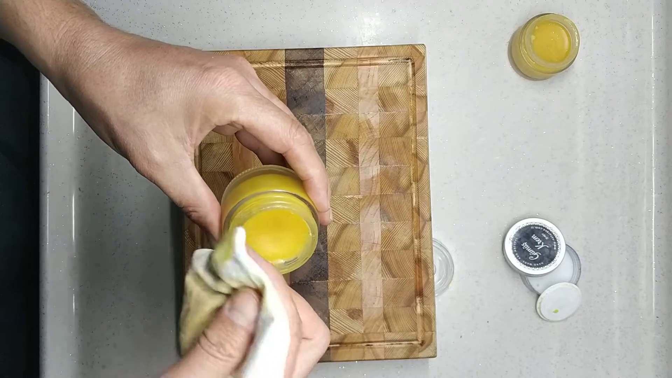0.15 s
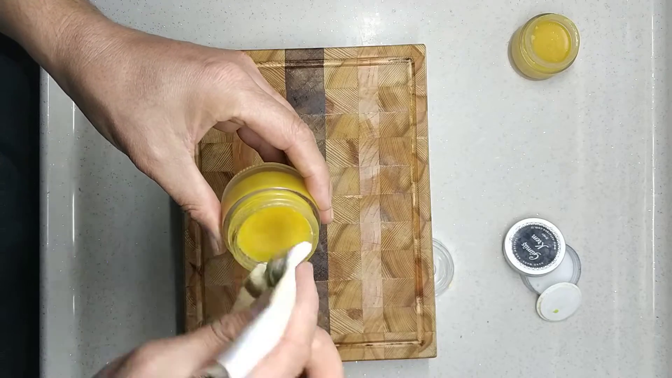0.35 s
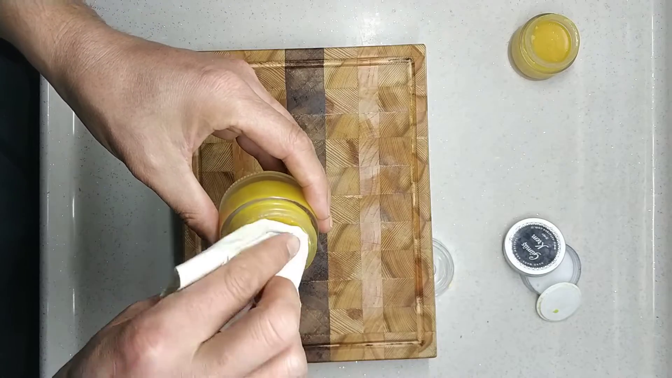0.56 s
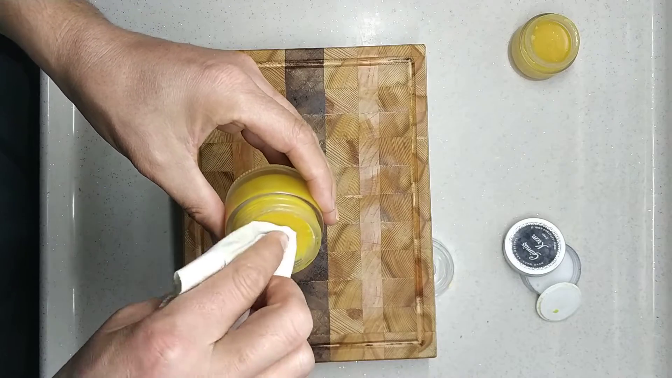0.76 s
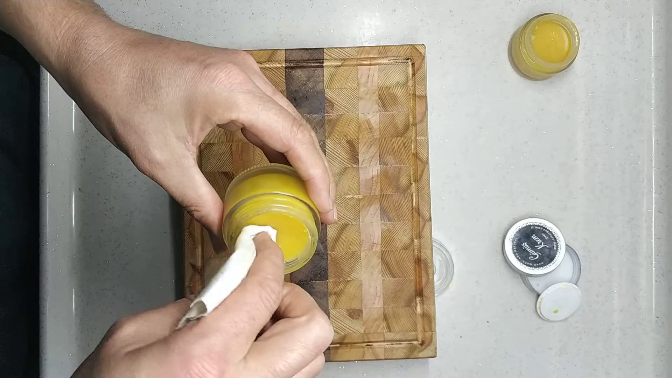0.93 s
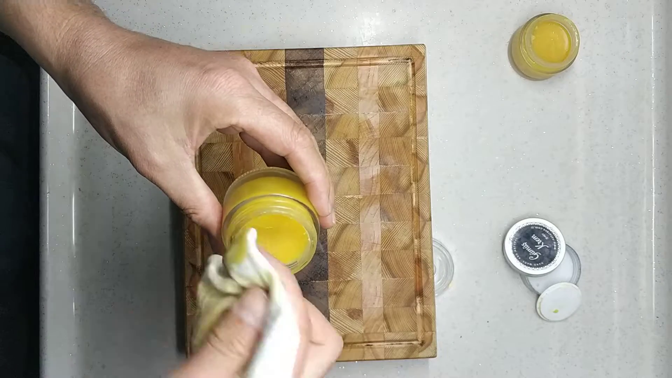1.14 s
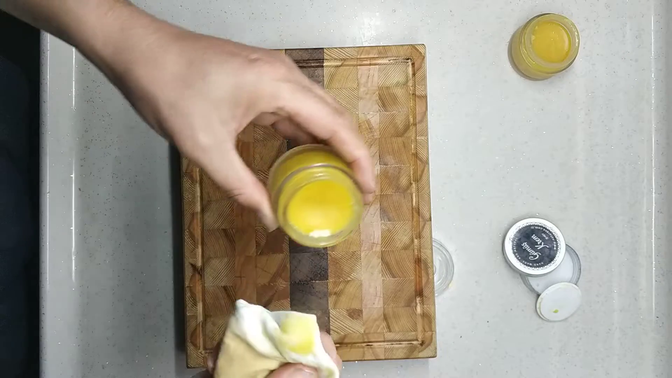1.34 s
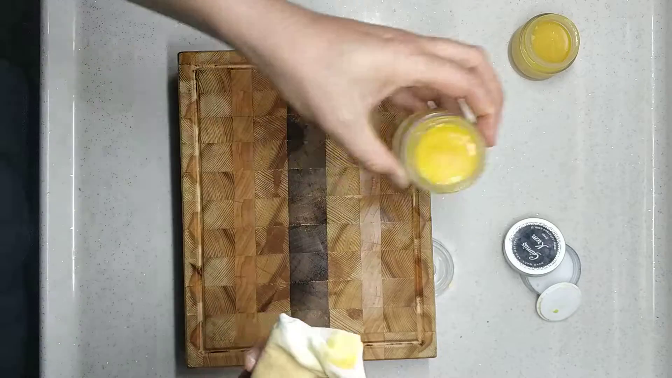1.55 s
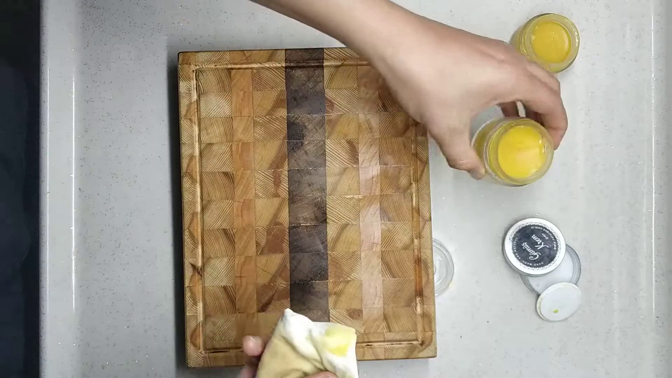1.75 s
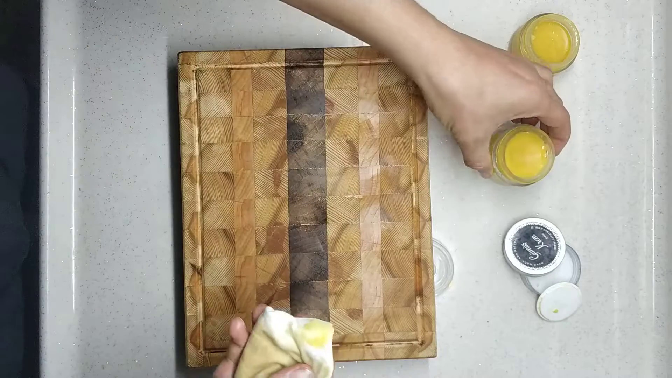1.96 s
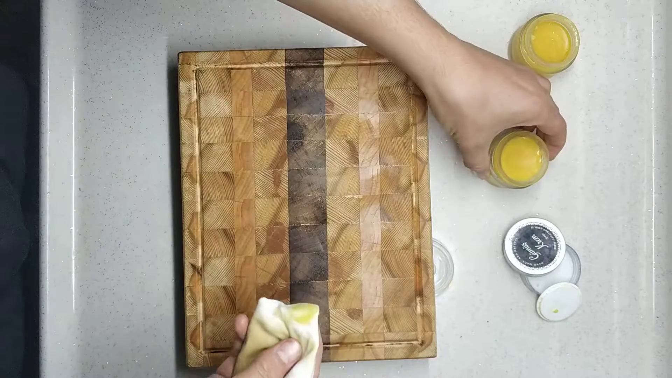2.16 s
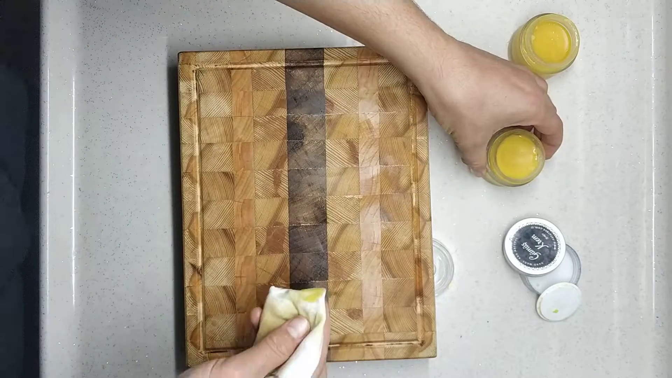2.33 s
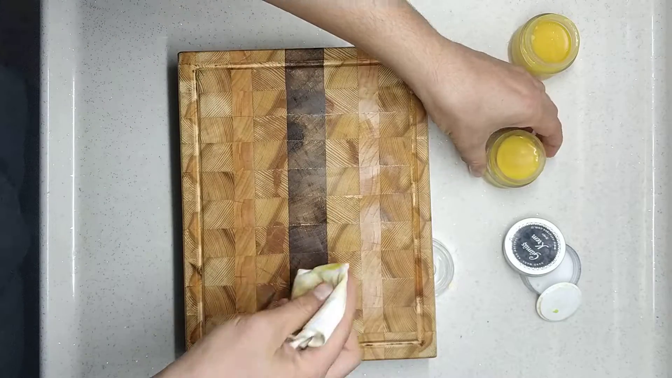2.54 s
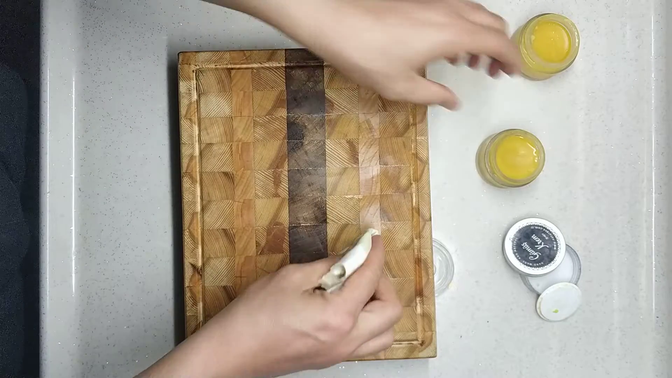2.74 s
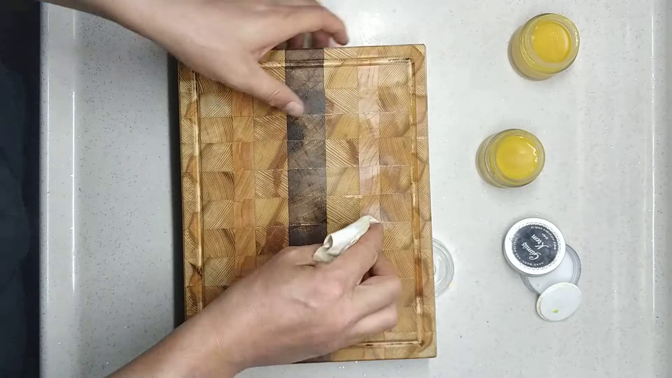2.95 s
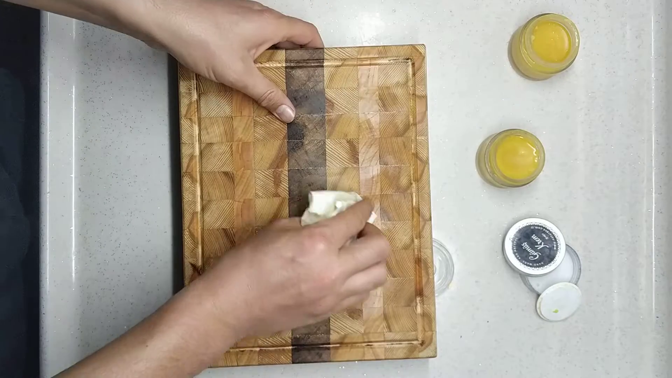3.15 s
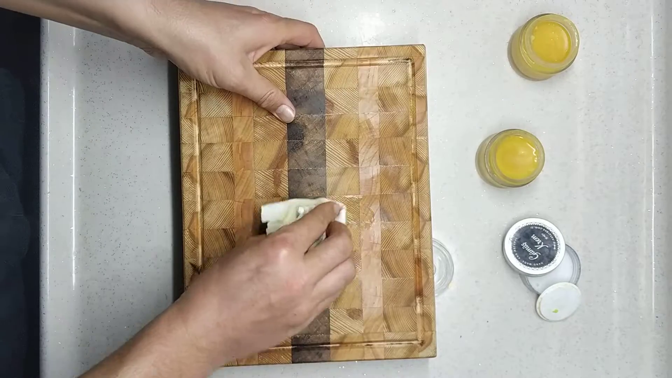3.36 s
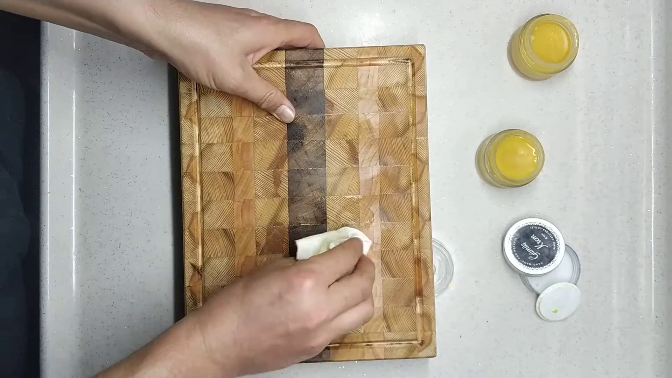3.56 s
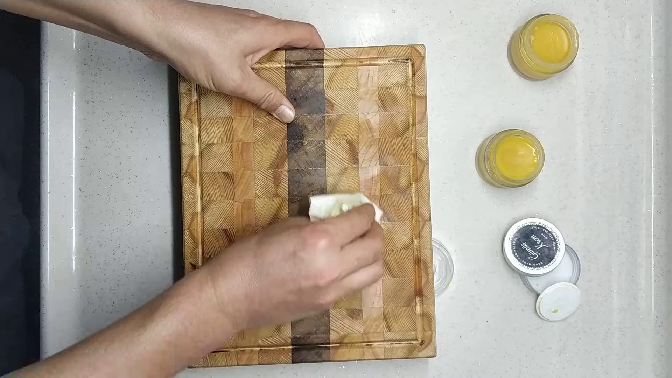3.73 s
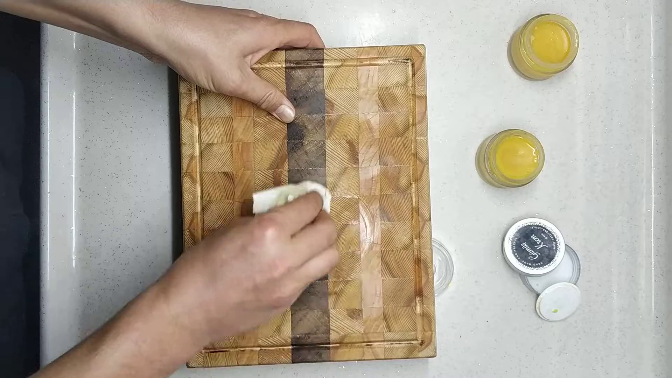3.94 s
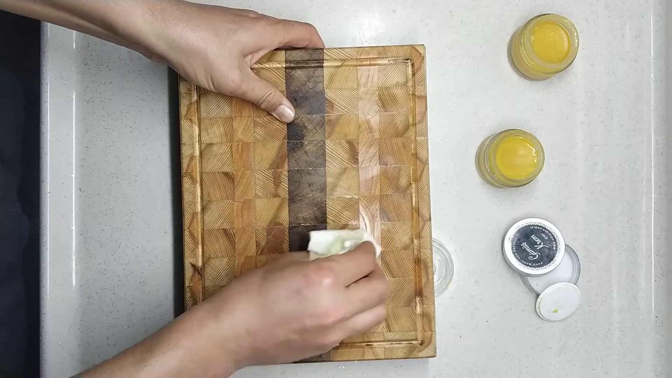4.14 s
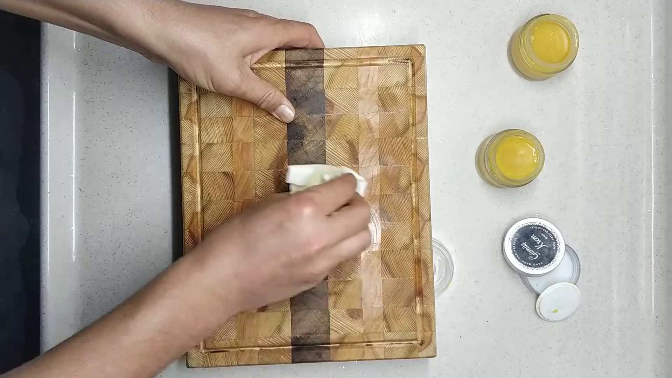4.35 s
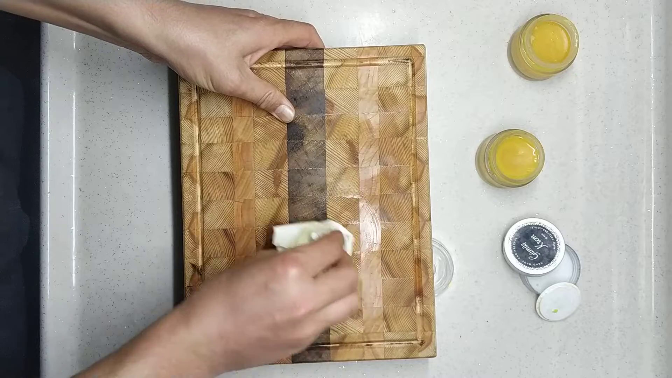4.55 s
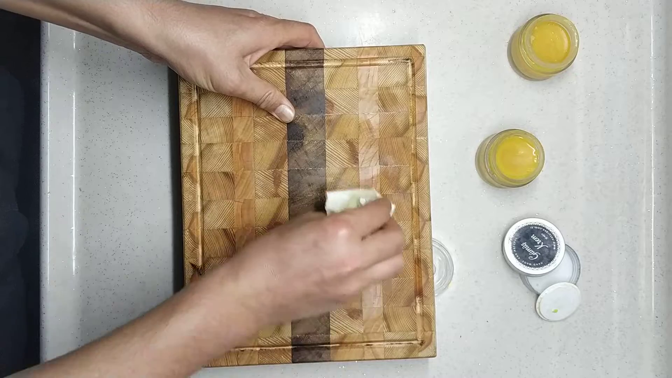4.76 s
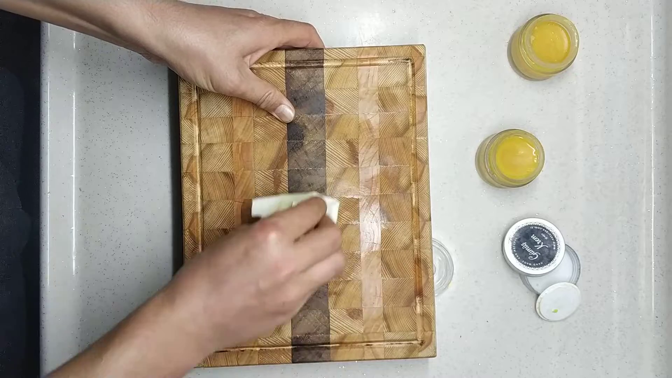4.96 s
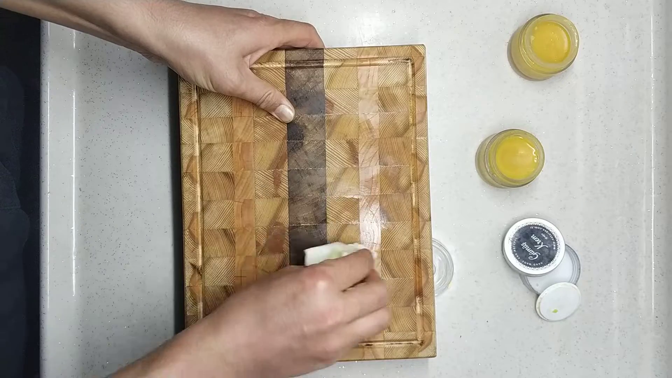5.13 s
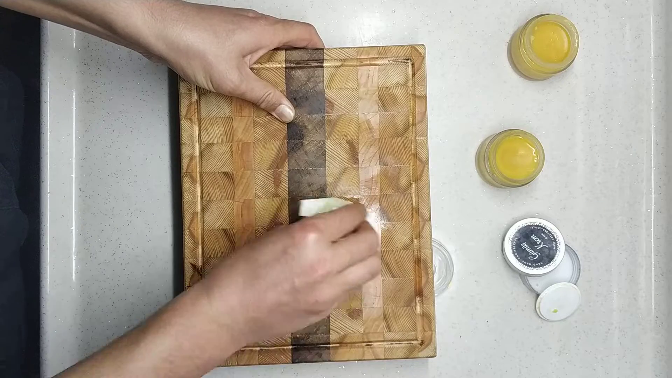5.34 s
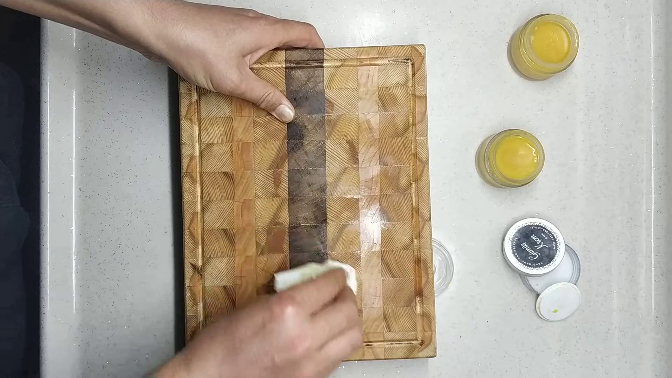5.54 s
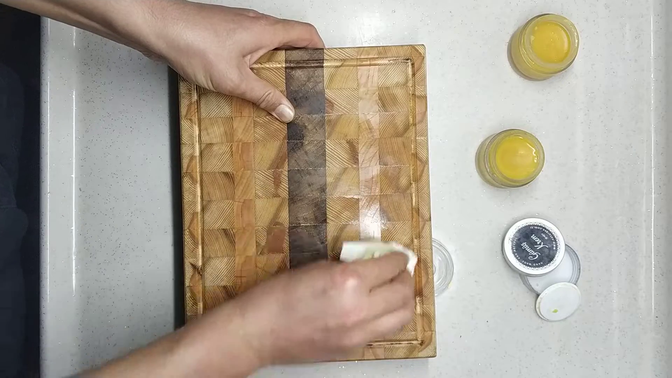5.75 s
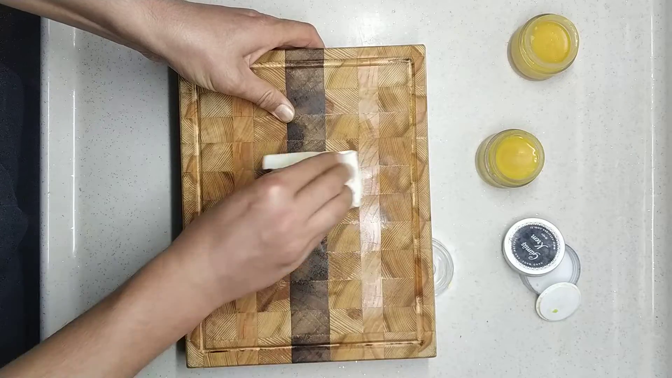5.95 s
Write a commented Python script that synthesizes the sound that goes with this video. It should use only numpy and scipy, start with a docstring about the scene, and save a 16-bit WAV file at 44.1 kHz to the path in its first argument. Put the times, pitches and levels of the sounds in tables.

```python
"""A folded cloth rubs wax into a wooden board on a kitchen counter, under a phone: filtered noise whose
gain follows the speed of each stroke. Before that the sticky cloth snaps off the wax and a glass jar is
set down, rocking once. Short noise bursts crack, and most ring decaying modes of what they strike; the
board knocks and rumbles on the counter as the strokes push it. A small hard room, a decaying noise tail,
answers each knock."""
import sys
import numpy as np
from scipy import signal
from scipy.fft import rfft, irfft, next_fast_len
from scipy.io import wavfile
from scipy.ndimage import uniform_filter1d

SR = 44100
rng = np.random.default_rng(int(sys.argv[2]) if len(sys.argv) > 2 else 0)


def volts_from_decibels(level):
    """Turn decibel levels (scalar or array-like) into linear amplitude factors."""
    exponent = np.asarray(level, float) / 20
    return 10 ** exponent


def log_audio(samples):
    """Write samples as a 16-bit WAV file to the path given in sys.argv[1]."""
    # one column per channel
    frames = np.atleast_2d(samples).T
    # limit to full scale, then quantise
    limited = np.clip(frames, -1, 1)
    pcm = np.round(limited * 32767).astype(np.int16)
    wavfile.write(sys.argv[1], SR, pcm)


N = 264600
T = np.arange(N) / SR  # seconds


def level(x, db):
    """Root-mean-square level: scale a signal to the given dB."""
    return x * volts_from_decibels(db) / np.sqrt(np.mean(x ** 2))


def shape(x, gain_at):
    """Linear filtering: multiply the spectrum by a gain given as a function of frequency."""
    size = 2 * next_fast_len(len(x))
    hz = np.arange(size // 2 + 1) * SR / size
    return irfft(rfft(x, size) * gain_at(hz), size)[:len(x)]


def colour(x, table):
    """Minimum phase: a causal filter through (Hz, dB) points, its phase from the folded cepstrum."""
    hz, db = np.transpose(table)

    def gain_at(f):
        log_gain = np.log(volts_from_decibels(np.interp(np.log(f + 1), np.log(hz), db)))
        cepstrum = irfft(log_gain)
        fold = np.where(np.arange(len(cepstrum)) < len(f) - 1, 2., 0.)
        fold[0] = 1
        return np.exp(rfft(cepstrum * fold))
    return shape(x, gain_at)


def peaks(f, table):
    """Resonance: the summed complex response of (Hz, width in Hz, dB) peaks."""
    return sum(volts_from_decibels(db) / (1 + 2j * (f - hz) / width) for hz, width, db in table)


def shifting(x, depth_db, hold, wide):
    """Shifting reflections: as the hand moves, narrow streaks of pitch swell and fade."""
    _, _, z = signal.stft(x, nperseg=1024)
    field = rng.standard_normal(z.shape)
    field = uniform_filter1d(field, size=hold, axis=1)  # over time frames
    field = uniform_filter1d(field, size=wide, axis=0)  # over frequency bins
    return signal.istft(z * volts_from_decibels(depth_db * field / field.std()), nperseg=1024)[1][:N]


FASTEST_AT, SPEED_POWER = 0.46, 0.92  # share of a movement's length; gain grows as this power of speed


def sliding(table, steady):
    """Speed-dependent friction: layer gains follow each movement's speed; powers add to a steady part."""
    start, length, *db = np.transpose(table)[:, :, None]
    u = np.clip((T - start) / length, 0, 1)
    speeding_up = u / FASTEST_AT
    slowing_down = 2 - (1 - u) / (1 - FASTEST_AT)
    speed = np.sin(np.pi * np.where(u < FASTEST_AT, speeding_up, slowing_down) / 2)
    power = np.abs(speed) ** (2 * SPEED_POWER)
    return np.sqrt(steady ** 2 + np.sum(volts_from_decibels(np.array(db)) ** 2 * power, axis=1))


# Colour of the fibre hiss. Each row: frequency in Hz, gain in dB.
HISS_COLOUR = [(1500, -34), (2600, -6.5), (3200, 0), (4500, 3), (6000, 1.5), (7500, -0.5), (9200, 4),
               (10000, -7), (10800, -17), (14000, -51.5)]
# Air between hand, board and phone colours the hiss. Each row: frequency in Hz, width in Hz, gain in dB.
AIR_RESONANCES = [(3100, 630, 4.5), (4760, 550, -7.5), (10000, 1100, -7)]


def fibre_hiss(pressed_gain, light_gain, top_gain):
    """Broadband friction noise: fibres catching on the grain hiss, duller under a light touch."""
    grains = rng.standard_normal(N) * volts_from_decibels(.9 * rng.exponential(size=N))  # uneven grain strengths
    hiss = shape(colour(grains, HISS_COLOUR), lambda f: 1.07 + abs(peaks(f, AIR_RESONANCES)))
    hiss = shifting(hiss, depth_db=3.5, hold=6, wide=2)
    top = shape(hiss, lambda f: 1 / (1 + (6200 / (f + 1)) ** 6))  # above 6200 Hz
    dull = shape(hiss, lambda f: 1 / (1 + (f / 4660) ** 6))  # below 4660 Hz
    pressed = level(hiss - top, -1.6) * pressed_gain
    light = level(dull, 0) * light_gain
    return pressed + light + level(top, -0.38) * top_gain


def slow_drag(scrub):
    """Damped resonance: drag rings the board, whose modes the pressing hand widens."""
    damped = [(hz, 70, db) for hz, db, t60 in BOARD_MODES]
    scrub = colour(scrub, [(300, -15), (480, -0.5), (950, 3.5), (1300, -3.5), (1700, -39)])
    return level(shape(scrub, lambda f: 0.18 + abs(peaks(f, damped))), 0)


# High modes woken by rubbing. Each row: frequency in Hz, width in Hz, gain in dB.
GRAIN_MODES = [(1600, 60, -1), (2030, 140, 0), (2260, 80, -3)]


def quick_drag(scrub):
    """Resonant filtering: the same scrubbing noise excites higher modes of the board."""
    scrub = colour(scrub, [(1000, -20), (1500, 0), (2400, 0), (3000, -20)])
    return level(shape(scrub, lambda f: .45 + abs(peaks(f, GRAIN_MODES))), 0)


# The mode that sings unpressed. Each row: frequency in Hz, width in Hz before squaring, gain in dB.
LIGHT_MODE = [(2034, 70, 0)]


def light_singing():
    """Narrow-band resonance: under a light touch one mode sings."""
    return level(shape(rng.standard_normal(N), lambda f: peaks(f, LIGHT_MODE) ** 2), -5)


# Strokes of the cloth over the board. Each row: start in seconds, length in seconds, then peak gains
# in dB of fibre hiss, top of the hiss, quick drag and slow drag.
STROKE_ROWS = [(3.178, 0.43, -68, -66.5, -67.5, -72.5), (3.62, 0.47, -62.5, -68.5, -67.5, -74),
               (3.92, 0.29, -59, -57.5, -68, -73), (4.28, 0.3, -60.5, -64, -66, -68.5),
               (4.489, .15, -57.5, -56.5, -68, -68), (4.57, 0.19, -63, -62, -77, -71.5),
               (4.81, 0.15, -63, -61, -67, -63), (4.891, .13, -60.5, -61, -63.5, -66.5),
               (4.979, 0.16, -61, -61, -74, -72), (5.09, .26, -63, -61, -65.5, -67.5),
               (5.241, 0.25, -67.5, -77, -64.5, -68), (5.375, 0.2, -61, -57, -68, -71),
               (5.522, 0.18, -61, -58, -68, -76), (5.75, 0.17, -59.5, -55.5, -65, -77),
               (5.861, 0.19, -64.5, -59, -69, -72)]
# Cloth and fingers shuffling on jar and board. Each row: start in seconds, length in seconds, then
# peak gains in dB of fibre hiss, top of the hiss, quick drag and slow drag.
SHUFFLE_ROWS = [(-.3, 0.71, -82, -92, -72, -72), (.23, 0.14, -73, -100, -77, -74),
                (0.366, .17, -80, -74, -76.5, -81), (.57, 0.12, -72.5, -80, -76, -76),
                (1.237, 0.36, -75.5, -89, -79.5, -79), (1.543, 0.17, -70.5, -76, -78, -87),
                (2.575, 0.34, -64, -94, -65, -66.5), (2.834, 0.37, -74, -94, -70, -73.5),
                (3.035, 0.073, -70.5, -71, -89, -80)]
# Hands at rest. The entries: gains in dB of hiss, top, quick drag and slow drag.
RESTING_GAINS = (-80.5, -78, -85, -80.5)
# The cloth turns between strokes without stopping. The entries: gains in dB, in the same order.
TURNING_GAINS = (-67.5, -65, -75, -82)
RUBBING_FROM_S, RUBBING_RISE_S = 3.56, .15


def cloth():
    """Sliding friction: the cloth's movements drive fibre hiss, board drag and a singing mode."""
    rubbing = np.clip((T - RUBBING_FROM_S) / RUBBING_RISE_S, 0, 1)
    pressed = sliding(STROKE_ROWS, np.outer(volts_from_decibels(TURNING_GAINS), rubbing))
    light = sliding(SHUFFLE_ROWS, volts_from_decibels(RESTING_GAINS)[:, None])
    top_gain, quick_gain, slow_gain = np.hypot(pressed, light)[1:]
    scrub = shifting(rng.standard_normal(N), depth_db=4.5, hold=8, wide=2)
    drag = slow_drag(scrub) * slow_gain + quick_drag(scrub) * quick_gain
    return fibre_hiss(pressed[0], light[0], top_gain) + light_singing() * light[2] + drag


# Spectrum of the background. Each row: frequency in Hz, gain in dB.
QUIET_COLOUR = [(24, -96), (40, -67.5), (197, -4), (279, -5), (314, -6.5), (468, -6), (730, -18.5),
                (821, -11.5), (2050, -16), (2350, -19.5), (3350, -16), (9380, -22), (10800, -37),
                (14000, -64), (22000, -120)]


def quiet():
    """Stationary noise: room air and microphone hiss."""
    return level(colour(rng.standard_normal(N), QUIET_COLOUR), -72)


def ring(t, modes, hard_db):
    """Modal decay: resting contact splits each mode into a beating pair and limits its ring."""
    hz, db, t60 = np.repeat(np.transpose(modes), 2, axis=1)[:, :, None]
    hz = hz * (1 + 0.015 * rng.standard_normal(hz.shape))
    t60 = np.clip(t60, .02, .19)
    phase = 2 * np.pi * (hz * t + rng.random(hz.shape))
    decay = volts_from_decibels(db + hard_db * np.log2(hz / 1000) - 60 * t / t60)
    return np.sum(decay * np.sin(phase), axis=0)


def contact(t, noise, chatter_ms, hard_db):
    """Impact excitation: a short burst of chatter, flattened and then tilted by hardness."""
    u = t * 1000 / chatter_ms
    push = noise * np.minimum(8 * u, 1) * np.exp(-u ** 4)
    # a contact has an even spectrum: flatten the lumps of this one burst
    lumps = uniform_filter1d(np.abs(rfft(push, 4096)) ** 2, size=17)[1:]
    push = colour(push, np.transpose([np.arange(1, 2049) * SR / 4096, -10 * np.log10(lumps)]))
    return colour(push, [(125, -3 * hard_db), (8000, 3 * hard_db)])


def knocks(table, modes, crack, ring_db):
    """Impact and resonance: each contact cracks broadly while any modes build up, then ring."""
    out, t = np.zeros(N + SR), np.arange(SR // 2) / SR
    for s, db, chatter_ms, hard_db in table:
        push = contact(t, rng.standard_normal(len(t)), chatter_ms, hard_db)
        sound = level(colour(push, crack), 0)
        if modes:
            build_up = np.minimum(3 * t * 1000 / chatter_ms, 1)
            sound = sound + level(ring(t, modes, hard_db) * build_up, ring_db)
        start = int(s * SR)
        # the level is that of the loudest few milliseconds
        loudest = np.sqrt(uniform_filter1d(sound ** 2, size=400).max())
        out[start:start + len(t)] += volts_from_decibels(db) * sound / loudest
    return out[:N]


# The board tipping onto a foot. Each row: start in seconds, level in dB, chatter in ms,
# hardness in dB per octave.
THUD_ROWS = [(.009, -58.5, 39, -1.5), (0.07, -61.5, 17, -4.5), (1.913, -70, 12, 0), (2.92, -64.5, 16, -7),
             (3.207, -60, 38, -0.5), (3.31, -67, 13, 2), (3.431, -54.5, 22, 8), (3.525, -58, 27, 0),
             (3.64, -67.5, 19, 4), (3.847, -69.5, 15, 7), (3.969, -62, 44, -2.5), (4.286, -60, 10, 10),
             (4.37, -64, 28, -11), (4.589, -55, 35, 2.5), (4.67, -55.5, 30, -2.5), (4.699, -57, 23, 7.5),
             (4.801, -90, 25, 0), (5.099, -65, 26, 9), (5.18, -71, 15, -3.5), (5.337, -62, 18, -1),
             (5.987, -41, 16, 6.2)]
# Broad spectrum of each thud. Each row: frequency in Hz, gain in dB.
THUD_COLOUR = [(70, -28.5), (130, -8.5), (200, 3), (280, -10), (400, -25.5), (1000, -68)]


def thuds():
    """Low-frequency impact: each tip onto a foot excites the two lowest board modes."""
    return knocks(THUD_ROWS, BOARD_MODES[:2], THUD_COLOUR, ring_db=-19.5)


# The board on its feet. Each row: frequency in Hz, width in Hz before squaring, gain in dB before squaring.
ROCK_MODES = [(167.6, 37, 3), (197.5, 21, -2.5), (243.4, 25, -4.5)]
ROCKING_DB, ROCKING_T60_S, TREMBLE_DB = -2.5, 0.58, -83  # rocking is relative to its thud


def rumble():
    """Exponential decay: after each thud the board rocks on, over a faint steady tremble."""
    s, db = np.transpose(THUD_ROWS)[:2, :, None]
    after = (T > s) * volts_from_decibels(db + ROCKING_DB - 60 * np.maximum(T - s, 0) / ROCKING_T60_S)
    gain = np.sqrt(volts_from_decibels(TREMBLE_DB) ** 2 + np.sum(after ** 2, axis=0))
    return level(shape(rng.standard_normal(N), lambda f: peaks(f, ROCK_MODES) ** 2), 0) * gain


# Sticky cloth letting go. Each row: start in seconds, level in dB, chatter in ms,
# hardness in dB per octave.
SNAP_ROWS = [(.599, -73, 21, -7.5), (1.112, -42, 6.5, 1.5), (1.13, -60, 5.2, 15), (1.59, -64.5, 2.9, -8.5),
             (2.584, -61, 12, -7.5), (3.221, -71, 6, -6)]
# Broad spectrum of each snap. Each row: frequency in Hz, gain in dB.
SNAP_COLOUR = [(600, -38.5), (1600, -20), (3200, -1.5), (4500, -8), (7000, 1), (8900, 4), (9800, -1.5),
               (11000, -20)]


def snaps():
    """Adhesive release: the cloth lets go in bursts that ring no modes."""
    return knocks(SNAP_ROWS, [], SNAP_COLOUR, ring_db=0)


# The jar set down. Each row: start in seconds, level in dB, chatter in ms, hardness in dB per octave.
JAR_ROWS = [(2.307, -30, 14.4, -1.7), (2.441, -35.5, 11, -2.5), (2.451, -28.5, 8.3, 0)]
# What rings as the jar lands: glass and the counter under it. Each row: nominal frequency in Hz,
# gain in dB, t60 in seconds before its limit.
LANDING_MODES = [(178.3, -10, 0.19), (374, -6, .3), (411, -14, .3), (553, -4, 0.24), (677, 0, 0.31),
                 (880, -1, 0.15), (870, -0.5, .2), (967, -7, 0.26), (1110, -14, 0.15), (1298, 5.5, 0.085),
                 (1624, -3.5, 0.24), (1597, -3, 0.27), (1756, -8, 0.15), (1720, -22, 0.064),
                 (1870, -18, 0.28), (1940, -12, 0.22), (2034, -1.5, .3), (2130, -10, 0.13),
                 (2320, -26, 0.18), (2200, -19, 0.147), (2680, -15, 0.094), (2920, -20, .2),
                 (3120, -15, 0.32), (3260, -6, 0.18), (3163, -7.5, 0.29), (3630, -29, .25)]
# Broad crack as the jar lands. Each row: frequency in Hz, gain in dB.
JAR_COLOUR = [(100, -46), (170, -11.5), (400, -14), (900, 4.5), (1300, -2.5), (2000, 3.5), (2700, -3),
              (3600, -16), (4200, -22), (5500, -24.5), (7000, -40), (11000, -66)]


def jar():
    """Modal excitation: each knock of the jar rings the glass and the counter under it."""
    return knocks(JAR_ROWS, LANDING_MODES, JAR_COLOUR, ring_db=-4)


# The board knocking. Each row: start in seconds, level in dB, chatter in ms, hardness in dB per octave.
BOARD_ROWS = [(3.150, -54.5, 4.4, -3.5), (3.393, -30, 9.5, -1.22), (3.494, -38.5, 1.8, -3),
              (3.543, -48.5, 3.4, -5), (3.59, -58.5, 3.6, -3), (5.988, -26, 14, -0.5)]
# What rings as the board knocks. Each row: nominal frequency in Hz, gain in dB,
# t60 in seconds before its limit.
BOARD_MODES = [(150, -5, 0.076), (199.1, 1.5, 0.068), (466, -3.5, 0.9), (547.6, -2, 0.26), (663, 6.5, 0.12),
               (760, -21, 0.066), (830, -27.5, 0.11), (954, -9.5, 0.24), (1275, -7.5, 0.48),
               (1898, -39, 0.085), (2270, -10.5, 0.28), (2530, 6, 0.07), (3043, -19, 0.24),
               (3000, -30, .15), (3800, -25, .15), (4670, -30, 0.069)]
# Broad crack of the board. Each row: frequency in Hz, gain in dB.
BOARD_COLOUR = [(100, -51), (200, 1), (350, -20), (700, -2.5), (1100, -16.5), (2300, -18.5), (3200, -14.5),
                (5000, -18), (8000, -24), (11000, -41)]


def board():
    """Modal excitation: each knock on the counter rings the board's modes."""
    return knocks(BOARD_ROWS, BOARD_MODES, BOARD_COLOUR, ring_db=-4)


def room(x):
    """Reverberation: convolution with a dense tail, the sum of a slower and a faster decay."""
    t = np.arange(int(.7 * SR)) / SR
    slower = colour(rng.standard_normal(len(t)), [(1500, -0.5), (6000, -5.5)]) * volts_from_decibels(-60 * t / 0.47)
    faster = colour(rng.standard_normal(len(t)), [(900, -3.7), (3500, -0.56)]) * volts_from_decibels(-60 * t / 0.27)
    tail = (slower + faster) * np.clip(t / 0.007, 0, 1)
    tail = tail / np.sqrt(np.sum(tail ** 2))
    return volts_from_decibels(-1.5) * signal.fftconvolve(x, tail)[:N]


def scatter(x):
    """Early reflection: close echoes that reach the two ports differently."""
    t = np.arange(SR // 40) / SR
    echoes = rng.standard_normal(len(t)) * volts_from_decibels(-60 * t / 0.005)
    return signal.fftconvolve(x, echoes / np.sqrt(np.sum(echoes ** 2)))[:N]


# How often each band of the side signal is on. Each row: lower edge in Hz, share of the time from 0 to 1.
SIDE_ON_SHARE = [(0, 0), (4100, .07), (5100, .15), (5700, .22), (6900, .33), (7600, .45), (9000, .33),
                 (9800, .1), (10500, 0)]


def side_patches(side):
    """Band gating: the treble of the side signal switches on and off in brief patches."""
    hz, _, z = signal.stft(side, SR, nperseg=2048)
    edges, share = np.transpose(SIDE_ON_SHARE)
    chance, joined = rng.random((2, len(SIDE_ON_SHARE), z.shape[1]))
    chance = np.where(joined < .5, np.roll(chance, 1, axis=0), chance)  # neighbours often switch together
    on = chance < share[:, None]
    band = np.searchsorted(edges, hz, "right") - 1
    return signal.istft(z * on[band], nperseg=2048)[1][:N]


# Colour of the side signal while on. Each row: frequency in Hz, gain in dB.
SIDE_COLOUR = [(3000, -43), (4000, -16.5), (7000, 0), (10000, -4), (10800, -26)]


def scene():
    """Superposition: knocks through the room, rubbing close by; the side signal is treble in patches."""
    hits = jar() + board() + snaps() + thuds()
    wet = hits + room(hits)
    rub = cloth() + rumble()
    mid = wet + rub + quiet()
    spread = scatter(0.47 * wet + rub) + 0.37 * quiet()
    side = side_patches(colour(spread, SIDE_COLOUR))
    return np.array([mid + side, mid - side])


def low_pass(x):
    """Removes everything above the highest recorded frequency."""
    return signal.sosfilt(signal.butter(12, 10940, fs=SR, output="sos"), x)


def record(dry):
    """Band limiting: the phone drops the deep bass and the top octave."""
    bass_cut = signal.butter(4, 125, "high", fs=SR, output="sos")
    top_cut = signal.ellip(8, .3, 70, 10400, fs=SR, output="sos")
    mix = signal.sosfilt(np.vstack([bass_cut, top_cut]), dry)
    return low_pass(mix)


dry = scene()
out = record(dry)
log_audio(out)
```